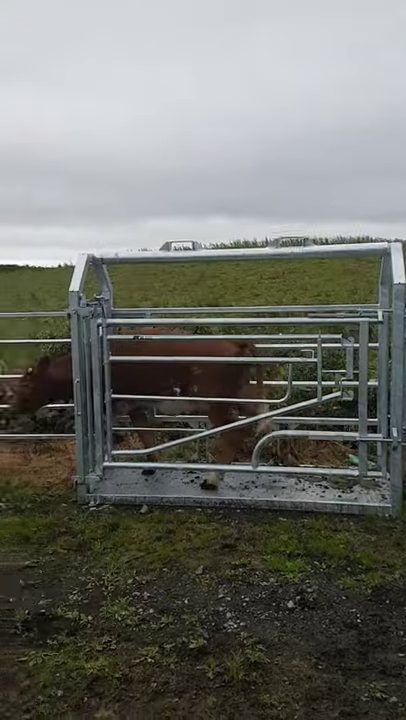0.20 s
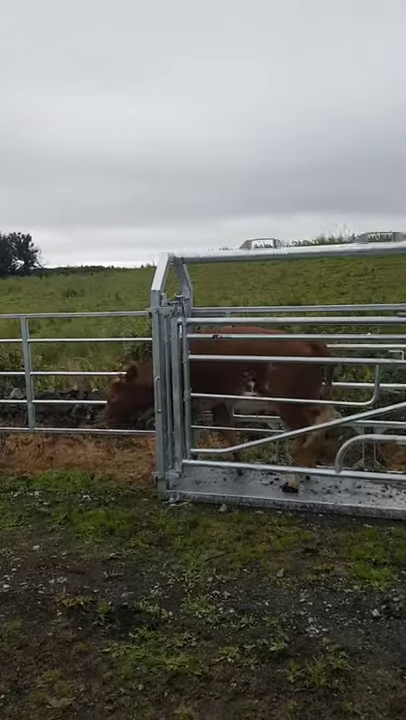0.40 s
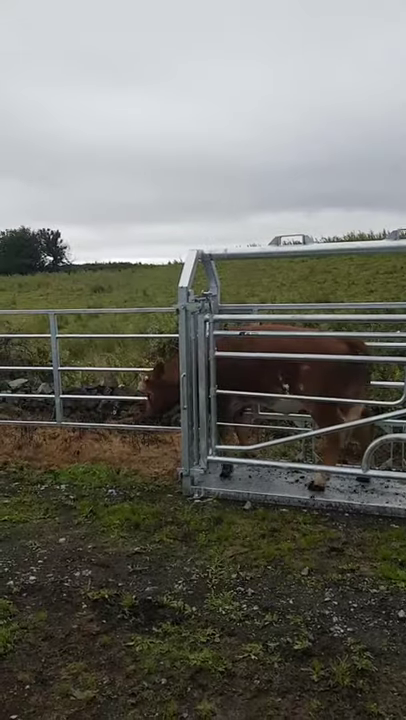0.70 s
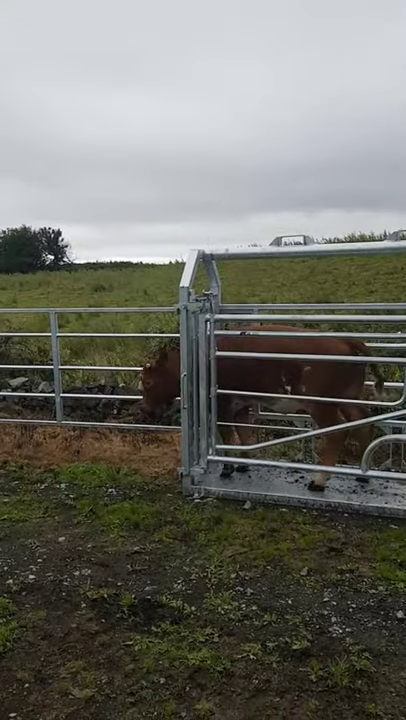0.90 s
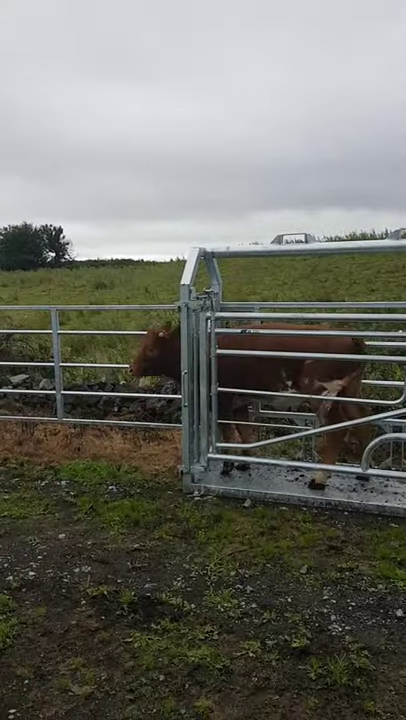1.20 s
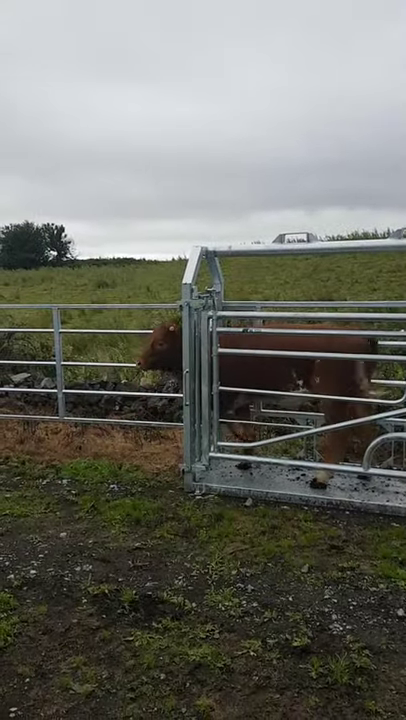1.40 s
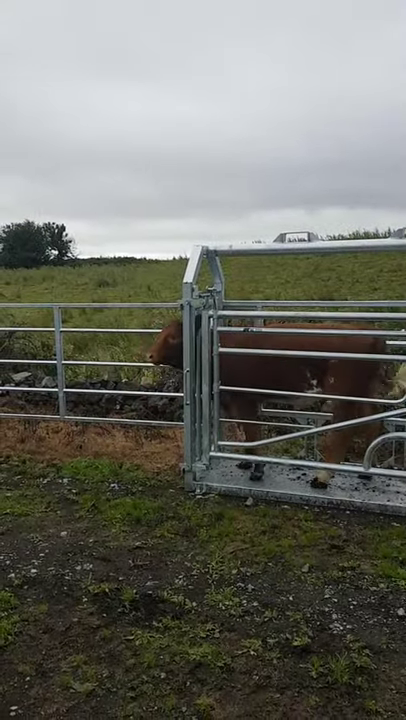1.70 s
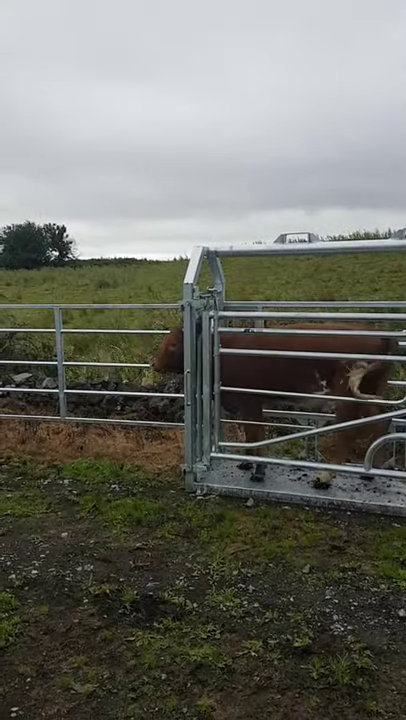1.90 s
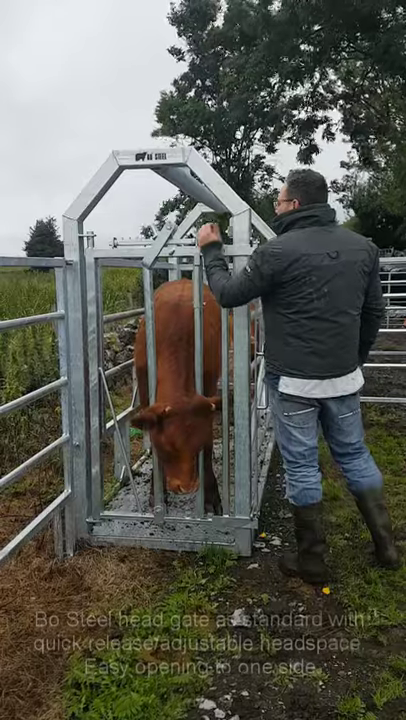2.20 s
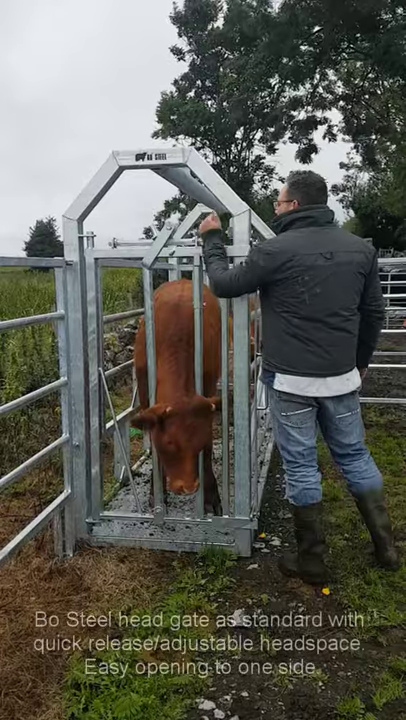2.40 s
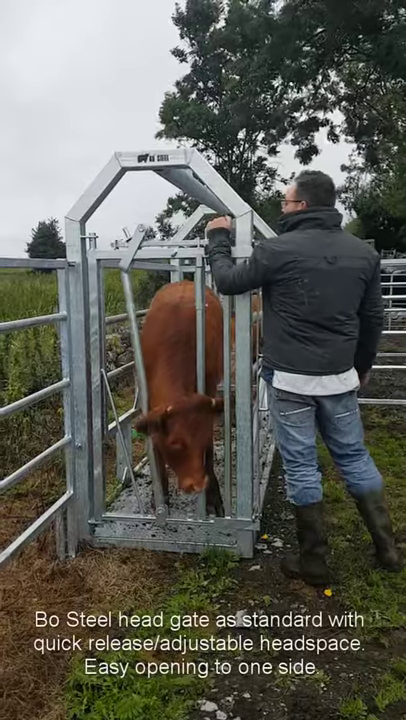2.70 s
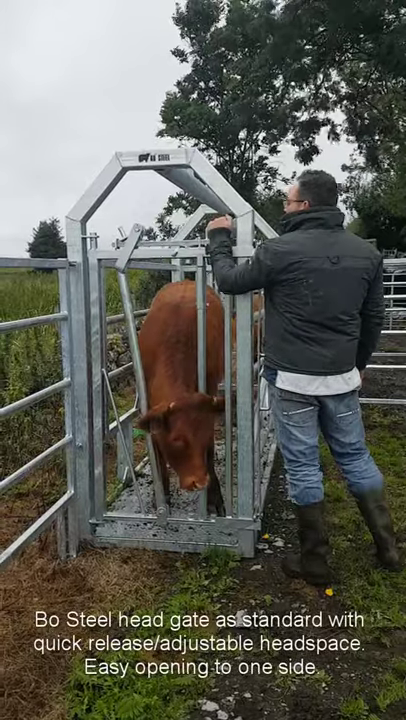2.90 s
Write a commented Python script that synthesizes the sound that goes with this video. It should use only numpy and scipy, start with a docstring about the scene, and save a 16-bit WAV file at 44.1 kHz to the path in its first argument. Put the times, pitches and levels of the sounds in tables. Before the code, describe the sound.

Galvanised steel cattle gate clangs and rattles in a windy field, then a head gate squeals

```python
"""Open field, a galvanised steel cattle crush, light wind rumbling on the microphone over open-air hiss.
A cow walks in: dull hoof thumps are soft-edged, low-coloured noise; clinks of pins and latches are dense high modes.
Bars and panels clang, chatter and ring: each contact is a crack, a wash of panel modes and wavering bar modes.
Sliding steel squeals as unsteady, fluttering tones. After a brief dip in level the head gate squeals and rattles.
"""
import sys
import numpy as np
from scipy import signal
from scipy.fft import rfft, irfft, next_fast_len
from scipy.io import wavfile
from scipy.ndimage import uniform_filter1d

SR = 44100
rng = np.random.default_rng(int(sys.argv[2]) if len(sys.argv) > 2 else 0)


def digitize_waveform(pressure):
    """Quantize a signal to 16-bit integers and store it at the path in sys.argv[1].

    Rows of a 2-D input are taken as channels; values are limited to [-1, 1].
    """
    field = np.atleast_2d(pressure).T
    bounded = np.clip(field, -1, 1)
    quanta = np.round(bounded * 32767).astype(np.int16)
    wavfile.write(sys.argv[1], SR, quanta)


N = 132300  # samples, 3 s

# Wind on the microphone: (time [s], level [dB]), and its spectrum: (frequency [Hz], level [dB])
WIND_LEVELS = [(0, -43.5), (.5, -35), (1.3, -51), (2.1, -46), (2.4, -38), (3, -45)]
WIND_SPECTRUM = [(20, -17), (85, -1.5), (400, -12.5), (900, -31.5), (16000, -64)]
# Open-air hiss: (time [s], level [dB]), and its spectrum: (frequency [Hz], level [dB])
AIR_LEVELS = [(0, -46.5), (2.15, -58.5), (3, -82)]
AIR_SPECTRUM = [(380, -3.5), (2300, -8.5), (4500, -23), (15000, -26)]
# Stereo width of all noise: (frequency [Hz], side against mid [dB])
STEREO_WIDTH = [(150, -0.5), (650, -8), (1100, -4), (4500, 0.5)]

# Hoof thumps on the floor: (time [s], level [dB]), and their spectrum: (frequency [Hz], level [dB])
HOOF_THUMPS = [(.055, -36), (.163, -35), (.38, -32), (.59, -25.5), (0.687, -37), (1.08, -40.5),
               (1.625, -40), (1.757, -35), (1.883, -48), (2.045, -43), (2.214, -37), (2.262, -33.5),
               (2.296, -28.5)]
THUMP_SPECTRUM = [(30, -22.5), (115, 3.5), (350, -14), (700, -44.5), (16000, -88)]
THUMP_T60_S, THUMP_RISE_S = 0.18, 0.0039
LOW_PAN_DB = 3  # left against right, for hooves and wind

# Clinks of pins and latches: (time [s], level [dB], lowest note [Hz])
FITTING_CLINKS = [(.203, -41, 5430), (0.342, -42.5, 5070), (.598, -35.5, 4710), (0.779, -40.5, 5150),
                  (1.25, -51.5, 7800), (1.887, -59.5, 7100), (2.716, -37, 4840), (2.786, -46.5, 12150),
                  (2.904, -53, 7000)]
# Spectrum of the clinks: (frequency [Hz], level [dB])
CLINK_SPECTRUM = [(5600, 5), (8500, -3.5), (13700, 0.5), (16000, -14)]
CLINK_T60_S, CLINK_PAN_DB = 0.41, -5.5

# Steel sliding on steel:
# (time [s], length [s], pitch [Hz], level [dB], gain of each next overtone [dB])
STEEL_SQUEALS = [(0.077, 0.05, 1295, -36.5, -16), (0.553, 0.086, 915, -19, -24),
                 (0.756, 0.165, 739, -26, -28), (0.966, 0.15, 1254, -35, -8), (2.454, 0.11, 1412, -23.5, 1)]
SQUEAL_JITTER = 0.024  # pitch deviation as a fraction of the pitch
SQUEAL_T60_S, SQUEAL_FLUTTER_DB = 1, 3.5

# Knocks of the head gate: (time [s], level [dB], brightness [dB per octave])
HEAD_GATE_KNOCKS = [(2.389, -37.5, -1.5), (2.416, -26.5, -0.5), (2.450, -23, -0.5), (2.527, -25.5, -3.5),
                    (2.542, -25.5, -3.5), (2.576, -25.5, -0.5), (2.591, -41, -2), (2.612, -27, 0.5),
                    (2.665, -30.5, -2.5), (2.718, -28.5, -2.5), (2.820, -28, -0.5), (2.856, -31, -2.5),
                    (2.904, -35.5, 1.5)]
# Spectrum of the gate: (frequency [Hz], level [dB])
GATE_SPECTRUM = [(60, -17), (350, -12), (720, -3.5), (2900, -10.5), (4300, -17), (7500, -30), (16000, -38)]
# Ringing of the gate: (frequency [Hz], level [dB], t60 [s])
GATE_RINGING = [(511, -2.5, 0.18), (738, -3, 0.4), (1181, 0.5, 0.49), (1907, -4, 0.4), (2820, 1.5, 0.24)]

# Taps on one loose bar: (time [s], level [dB], brightness [dB per octave])
LOOSE_BAR_TAPS = [(.366, -25, 0), (1.441, -37, 0.5)]
# Ringing of the loose bar, with one close pair that beats: (frequency [Hz], level [dB], t60 [s])
LOOSE_BAR_RINGING = [(1153, 3.5, 0.27), (1777, 3, 1.1), (1828, -9.5, 1.1), (3493, -5, 0.22),
                     (4130, -1, 0.15)]

# Blows on the frame and floor: (time [s], level [dB], brightness [dB per octave])
BLOWS_ON_FRAME = [(.034, -32.5, -7), (.068, -35, -0.5), (.201, -25.5, 0.5), (.238, -25.5, 0),
                  (.284, -27.5, -1), (.383, -25, -5), (.453, -24.5, 2.5), (.486, -20, -0.5),
                  (.509, -22.5, -1), (.532, -21.5, 0.5), (.543, -20, -2), (.553, -22, -0.5),
                  (.563, -19.5, -3.5), (.575, -21, 0.5), (.597, -17.5, -2.5), (.610, -18, 1),
                  (.623, -19, 1), (.647, -23, -0.5), (.745, -33, 7.5), (.811, -26, 1.5), (.844, -23.5, -2),
                  (.86, -23.5, 1), (.947, -32, 1.5), (1.748, -36.5, -3.5)]
# Spectrum of the frame, also used for the loose bar: (frequency [Hz], level [dB])
FRAME_SPECTRUM = [(30, -35), (130, -13), (380, -8), (560, -12), (760, -1.5), (950, -1.5), (1300, -7),
                  (1800, -3.5), (2900, -9), (3600, -14), (6500, -32), (16000, -40.5)]
# Ringing of the frame bars: (frequency [Hz], level [dB], t60 [s])
FRAME_RINGING = [(657, 0.5, 0.31), (726.7, 7.5, 0.33), (889, 5.5, 0.31), (944, 1, 0.43), (1011, -7.5, 1.76),
                 (1212, 1, 0.52), (1583, -7, 1.3), (1723, 0.5, 1.2), (1900, -8.5, 1.3), (2350, 1, 0.45),
                 (2610, -8, 1.4), (2938, -7, 1.4)]

# Decays (t60) in seconds; wash and ring levels are against the crack; pan is left against right
FRAME_STEEL = dict(crack_t60=0.038, wash_t60=0.9, wash_db=-2.5, ring_db=-4.5, damping=0.15,
                   pan_db=-1, chatter_max_s=0.015)
BAR_STEEL = dict(FRAME_STEEL, ring_db=0)
GATE_STEEL = dict(crack_t60=0.039, wash_t60=0.82, wash_db=1, ring_db=-4.5, damping=0.17,
                  pan_db=-1, chatter_max_s=0.017)
RING_WAVER_HZ = 14
RING_LOSS = 0.16  # dB of wash and ring lost per dB of force: a hard blow also damps the bars

# A light blow leaves the parts chattering longer than a hard one, which presses them together
CHATTER_S, CHATTER_AT_DB, CHATTER_HALVING_DB = 0.014, -27, 8
CHATTER_PER_S = 600  # mean rate of rebounds
CHATTER_SIZE, CHATTER_SPREAD_DB = 1.49, 2

DIP_S, DIP_DB = (2.121, 2.151), -31
TOP_HZ = 15900  # upper edge of the sound


def undb(db):
    """Decibels to gain."""
    return 10 ** (np.asarray(db) / 20)


def unit(x):
    """Scale to a mean energy of one per channel."""
    return x / np.sqrt(np.sum(x ** 2) / len(np.atleast_2d(x)) + 1e-20)


def fade(t, t60):
    """Exponential decay that falls 60 dB in t60 seconds."""
    return np.exp(-np.log(1000) * t / t60)


def pan(db):
    """Left and right gains that differ by db."""
    return undb(np.array([[db], [-db]]) / 2)


def smooth_random(n, size):
    """Slow random movement with a standard deviation of one."""
    x = uniform_filter1d(rng.standard_normal(n), size=size)
    return x / x.std()


def curve(points, hz):
    """Gain of a spectrum at the given frequencies, interpolated over log frequency."""
    f, db = np.array(points, float).T
    return undb(np.interp(np.log(np.maximum(hz, 1)), np.log(f), db))


def colour(x, points, tilt_db=0):
    """Minimum-phase filter with the given spectrum, tilted about 1.4 kHz."""
    n = next_fast_len(x.shape[-1] + 4096, real=True)
    hz = np.arange(n // 2 + 1) * SR / n
    octaves = np.log2(np.clip(hz, 400, 5000) / 1400)
    gain = curve(points, hz) * undb(tilt_db * octaves)
    # folding the cepstrum onto positive time makes the filter causal
    cepstrum = irfft(np.log(gain).astype(np.float32), n)
    cepstrum[1:n // 2] *= 2
    cepstrum[n // 2 + 1:] = 0
    response = np.exp(rfft(cepstrum))
    return irfft(rfft(x.astype(np.float32), n) * response, n)[..., :x.shape[-1]]


def noise(n):
    """Stereo noise whose width depends on frequency."""
    mid, side = rfft(rng.standard_normal((2, n)))
    width = curve(STEREO_WIDTH, np.arange(len(mid)) * SR / n)
    left_right = np.array([mid + width * side, mid - width * side])
    return irfft(left_right / np.sqrt(1 + width * width), n)


def add(out, start, x, db):
    """Mix in an event; its level is its energy spread over 20 ms."""
    i = int(start * SR)
    event = unit(x) * undb(db) * np.sqrt(SR / 50)
    out[:, i:i + x.shape[1]] += event[:, :N - i]


def steady(levels, spectrum):
    """Moving air: coloured noise that follows a level curve."""
    x = colour(noise(N), spectrum)
    level_db = np.interp(np.arange(N) / SR, *np.array(levels).T)
    return x / x.std() * undb(level_db)


def open_air():
    """Hiss of the open air around the crush."""
    return steady(AIR_LEVELS, AIR_SPECTRUM)


def wind():
    """Light wind rumbling on the microphone, low-coloured and stronger on the left."""
    return steady(WIND_LEVELS, WIND_SPECTRUM) * pan(LOW_PAN_DB)


def hooves():
    """Dull, soft-edged thumps of the floor plate: decaying noise with a gradual rise."""
    out, t = np.zeros((2, N)), np.arange(2 ** 14) / SR
    for start, db in HOOF_THUMPS:
        rise = 1 - np.exp(-t / THUMP_RISE_S)
        thump = noise(len(t)) * fade(t, THUMP_T60_S) * rise
        add(out, start, colour(thump, THUMP_SPECTRUM), db)
    return out * pan(LOW_PAN_DB)


def clinks(count=170):
    """Small loose steel parts ring briefly above their lowest note, each with its own modes, with hiss."""
    out, t = np.zeros((2, N)), np.arange(2 ** 14) / SR
    for start, db, low_hz in FITTING_CLINKS:
        bins = (rng.uniform(low_hz, TOP_HZ, count) * len(t) / SR).astype(int)
        modes = np.zeros((2, len(t) // 2 + 1), complex)
        phases = 2 * np.pi * rng.uniform(size=(2, count))
        modes[:, bins] = rng.rayleigh(size=count) * np.exp(1j * phases)
        highpass = signal.butter(2, low_hz, "high", fs=SR, output="sos")
        hiss = signal.sosfilt(highpass, noise(len(t)))
        clink = (unit(irfft(modes)) + unit(hiss)) * fade(t, CLINK_T60_S)
        add(out, start, colour(clink, CLINK_SPECTRUM), db)
    return out * pan(CLINK_PAN_DB)


def squeals(rise_s=0.036, release_s=0.013, count=2):
    """Sliding bars stick and slip, heard as harmonics of an unsteady pitch; the overtone dies first."""
    out, t = np.zeros((2, N)), np.arange(2 ** 13) / SR
    for start, length, hz, db, overtone_db in STEEL_SQUEALS:
        pitch = hz * (1 + SQUEAL_JITTER * smooth_random(len(t), 90))
        phase = 2 * np.pi * np.cumsum(pitch) / SR
        tone = 0
        for k in range(1, count + 1):
            offset = .5 * rng.standard_normal((2, 1))  # differs between left and right
            partial = np.sin(k * (phase + offset)) * fade(t, SQUEAL_T60_S / k)
            tone = tone + undb(overtone_db * (k - 1)) * partial
        flutter = undb(SQUEAL_FLUTTER_DB * smooth_random(len(t), 200))
        envelope = np.clip(t / rise_s, 0, 1) * np.clip((length - t) / release_s, 0, 1)
        add(out, start, tone * flutter * envelope, db)
    return out


def ring(t, hz):
    """One mode of a loosely held bar, whose pitch wavers as it shifts in its sockets."""
    pitch = hz + RING_WAVER_HZ * smooth_random(len(t), 1500)
    return np.exp(2j * np.pi * np.cumsum(pitch) / SR)


def wash(t, t60, damping):
    """Countless weak modes of a welded frame: octave bands of noise, dying sooner away from 1 kHz."""
    spectrum = rfft(noise(len(t)))
    hz = np.arange(spectrum.shape[1]) * SR / len(t)
    octave = np.log2(np.clip(hz, 125, 16000) / 1000)
    out = 0
    for k in range(-3, 5):
        band = irfft(spectrum * np.maximum(1 - abs(octave - k), 0), len(t))
        out = out + band * fade(t, t60 * 2 ** (-damping * abs(k)))
    return out


def chatter(length):
    """A first contact, then a spray of rebounds that builds up and dies."""
    gaps, sizes = rng.exponential(size=160), rng.standard_normal(size=160)
    when = np.cumsum(gaps) / CHATTER_PER_S
    dying = np.exp(-when / max(length, .001))
    size = CHATTER_SIZE * dying * (1 - dying ** 2) * undb(CHATTER_SPREAD_DB * sizes)
    size *= rng.choice([-1, 1], size=160)
    train = np.bincount((when * SR).astype(int), size, SR // 4)[:SR // 4]
    train[0] += 1
    return train[None]


def steel(blows, spectrum, modes, crack_t60, wash_t60, wash_db, ring_db, damping, pan_db, chatter_max_s):
    """Each blow chatters; every contact gives a short crack, a wash of panel modes and the ring of the bars."""
    out, t = np.zeros((2, N)), np.arange(2 ** 16) / SR
    short = t[:2 ** 12]
    rings = np.array([undb(db) * ring(t, hz) * fade(t, t60) for hz, db, t60 in modes], np.complex64)
    washes = [wash(t, wash_t60, damping) for _ in range(4)]  # taken in turn by the blows
    mode_octaves = np.log2(np.array(modes)[:, 0])
    for k, (start, db, tilt_db) in enumerate(blows):
        softness_db = CHATTER_AT_DB - db
        length = min(CHATTER_S * 2 ** (softness_db / CHATTER_HALVING_DB), chatter_max_s)
        free = undb(RING_LOSS * softness_db)

        body = free * undb(wash_db) * unit(colour(washes[k % len(washes)], spectrum, tilt_db))
        crack = noise(len(short)) * fade(short, crack_t60)
        body[:, :len(short)] += unit(colour(crack, spectrum, tilt_db))

        # mode phases are new for every blow and differ a little between left and right
        phase = rng.uniform(0, 2 * np.pi, len(modes)) + .5 * rng.standard_normal((2, len(modes)))
        share = unit(undb(tilt_db * mode_octaves)) * np.exp(1j * phase)
        bar_ring = share.astype(np.complex64).dot(rings).real
        body += free * undb(ring_db) * unit(bar_ring)

        contacts = chatter(length).astype(np.float32)
        add(out, start, signal.fftconvolve(body.astype(np.float32), contacts, axes=1), db)
    return out * pan(pan_db)


def head_gate():
    """The head gate rattles: chattering knocks excite its panel and bar modes."""
    return steel(HEAD_GATE_KNOCKS, GATE_SPECTRUM, GATE_RINGING, **GATE_STEEL)


def loose_bar():
    """Taps on one loose bar, its own modes ringing more strongly against the crack."""
    return steel(LOOSE_BAR_TAPS, FRAME_SPECTRUM, LOOSE_BAR_RINGING, **BAR_STEEL)


def frame():
    """Blows on the frame and floor set the bars and panels clanging and ringing."""
    return steel(BLOWS_ON_FRAME, FRAME_SPECTRUM, FRAME_RINGING, **FRAME_STEEL)


def scene():
    """Open air and wind, then hooves, fittings, squeals, head gate, loose bar and frame."""
    background = open_air() + wind()
    small_parts = clinks() + squeals()
    metal = head_gate() + loose_bar() + frame()
    return background + hooves() + small_parts + metal


def record(dry):
    """The level dips briefly, and a steep low-pass cuts the top."""
    t = np.arange(N) / SR
    inside = 1. * ((t > DIP_S[0]) & (t < DIP_S[1]))
    dip = uniform_filter1d(inside, size=200)  # softened edges
    lowpass = signal.ellip(8, .2, 70, TOP_HZ, fs=SR, output="sos")
    return signal.sosfilt(lowpass, dry * undb(DIP_DB * dip))


dry = scene()
out = record(dry)
digitize_waveform(out)
```